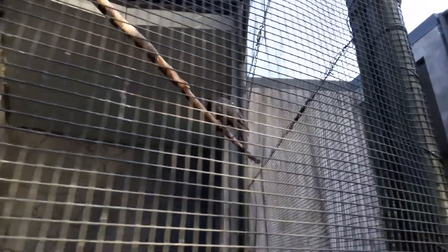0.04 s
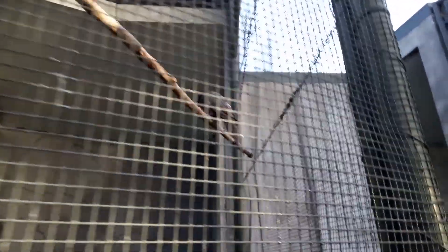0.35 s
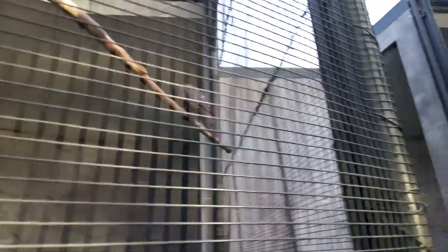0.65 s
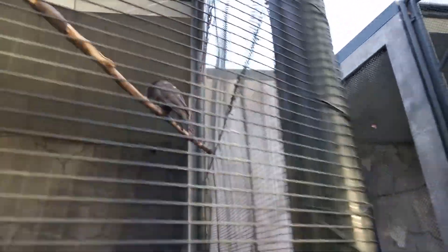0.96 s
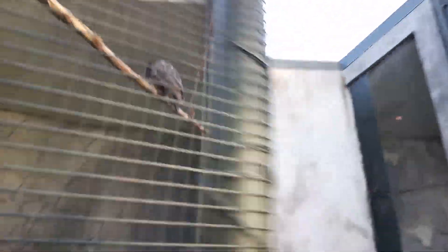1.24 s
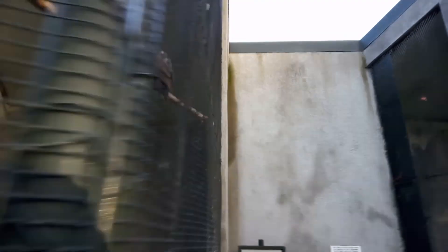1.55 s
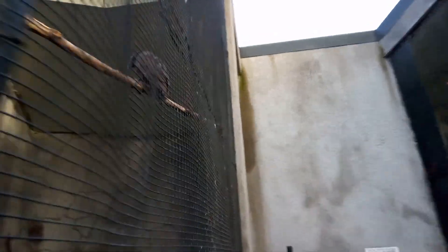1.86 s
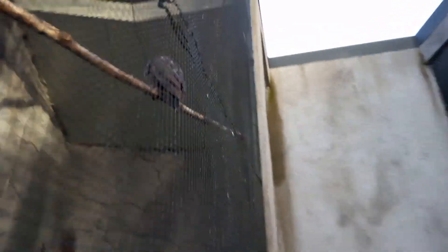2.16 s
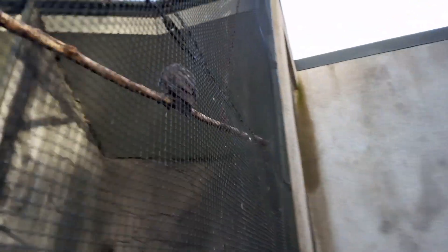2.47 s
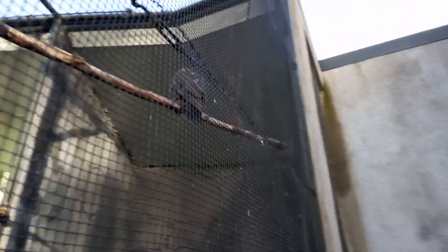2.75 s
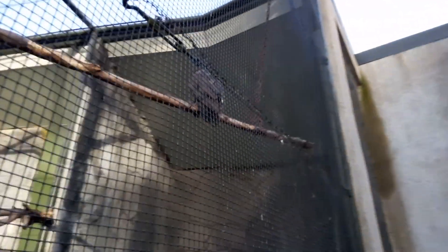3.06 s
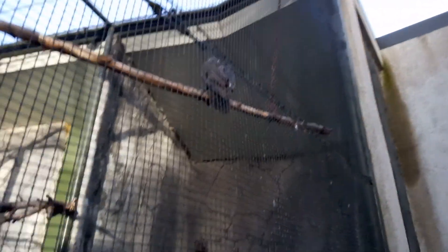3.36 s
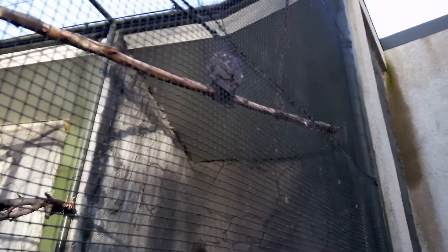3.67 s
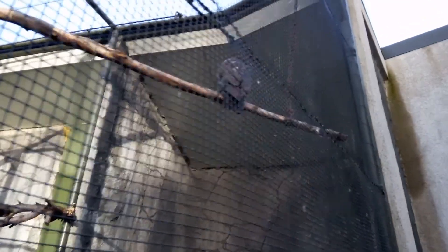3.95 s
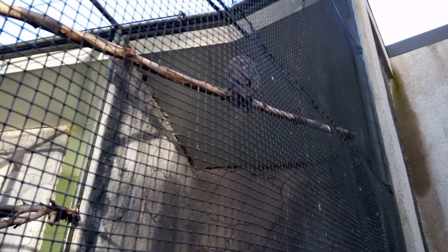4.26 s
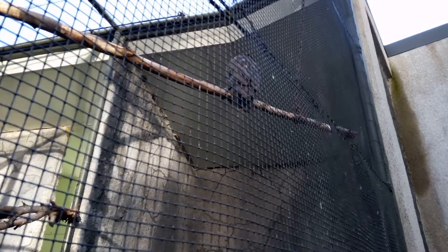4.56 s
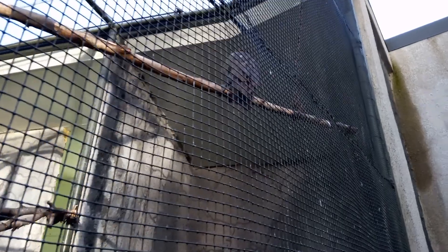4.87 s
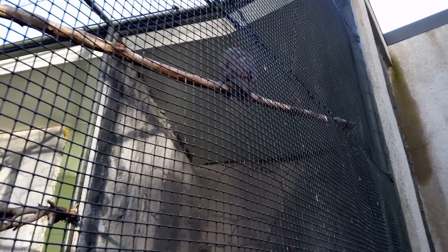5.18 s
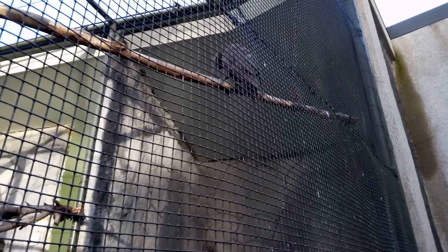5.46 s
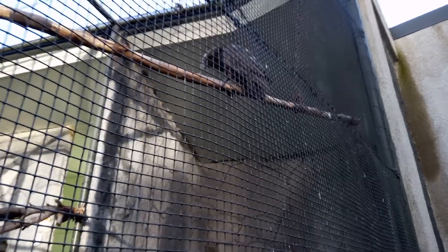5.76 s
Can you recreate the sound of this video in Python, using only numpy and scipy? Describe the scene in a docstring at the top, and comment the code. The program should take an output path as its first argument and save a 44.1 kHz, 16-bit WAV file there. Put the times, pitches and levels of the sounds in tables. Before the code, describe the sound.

Two loud parrot cries sink into a low rasp, with short falling chirps between, over steady outdoor noise in an echoing enclosure.

```python
"""In a concrete aviary fronted with wire mesh, a parrot gives two long falling cries that end harsh and low.
Between them come quick falling chirps, short pips and thin squeaks. Its voice is a vibrating membrane
that turns hoarse when its cycles grow uneven, and the hard walls echo every call.
Close by are a short scrape, a few ticks and taps and a faint rustle.
Behind it all are a steady wash of outdoor noise and a low hum that swells and fades."""
import sys
import numpy as np
from scipy import signal
from scipy.fft import rfft, irfft, next_fast_len
from scipy.io import wavfile
from scipy.ndimage import map_coordinates

SR = 44100
rng = np.random.default_rng(int(sys.argv[2]) if len(sys.argv) > 2 else 0)


def log_audio(samples):
    """Write samples as a 16-bit WAV file to the path given in sys.argv[1]."""
    # one column per channel
    frames = np.atleast_2d(samples).T
    # limit to full scale, then quantise
    limited = np.clip(frames, -1, 1)
    pcm = np.round(limited * 32767).astype(np.int16)
    wavfile.write(sys.argv[1], SR, pcm)


N = 265482
TIME = np.arange(N) / SR
CUTOFF_HZ = 16300


def from_db(db):
    """Turn decibels into a number to multiply by."""
    return 10 ** (np.asarray(db) / 20)


def rms_one(x):
    """Scale a sound so that its average strength (rms) is 1."""
    return x / np.sqrt(np.mean(x ** 2) + 1e-20)


def in_time(rows, t=TIME):
    """Read each column of a table at times t; every row begins with its time."""
    times, *columns = np.transpose(rows)
    return [np.interp(t, times, column) for column in columns]


def at_hz(rows, hz):
    """Read a table of frequencies and values at hz, with the octaves evenly spaced."""
    frequencies, values = np.transpose(rows)
    return np.interp(np.log(hz + 1e-9), np.log(frequencies), values)


def drift(rate, size):
    """A smooth random wobble, about 1 in size, that changes about rate times a second."""
    knots = rng.standard_normal(int(size / SR * rate) + 4)
    return map_coordinates(knots, [1 + np.arange(size) * rate / SR], order=3, mode="nearest")


def coloured(x, colour):
    """Give a sound a colour (a balance of low and high frequencies) and a strength of 1."""
    size = next_fast_len(len(x))
    hz = np.arange(size // 2 + 1) * SR / size
    return rms_one(irfft(rfft(x, size) * from_db(at_hz(colour, hz)), size)[:len(x)])


def resonance(x, hz, width):
    """Let a sound ring around one frequency; a narrower width in Hz rings longer."""
    r = np.exp(-np.pi * width / SR)
    feedback = [1, -2 * r * np.cos(2 * np.pi * hz / SR), r * r]
    return signal.lfilter(np.array([1, 0, -1]) * (1 - r * r) / 2, feedback, x + 1e-18)


def during(start, end, attack, release):
    """The sample numbers of one sound, their times, and a gate that fades it in and out."""
    at = np.arange(int(start * SR), min(int(end * SR), N))
    t = at / SR
    ramp = np.clip(np.minimum((t - start) / attack, (end - t) / release), 0, 1)
    return at, t, np.sin(np.pi / 2 * ramp) ** 2


def air(levels, colour, lumpy_db, rate):
    """Noise whose neighbouring half-octaves swell separately, by about lumpy_db."""
    size = 2 * next_fast_len(N // 2 + 1)
    hz = np.fft.rfftfreq(size, 1 / SR)
    spectrum = rfft(rng.standard_normal(size)) * from_db(at_hz(colour, hz))
    group = np.floor(2 * np.log2(hz + 1)) % 4
    parts = [irfft(spectrum * (group == k))[:N] * from_db(lumpy_db * drift(rate, N)) for k in range(4)]
    return from_db(in_time(levels)[0]) * rms_one(sum(parts))


def background():
    """The background: a wash of outdoor noise, a low rumble that swells in the middle of the scene, a deeper
    rumble, a hiss, and a thinner hiss that fades early."""
    # How loud each layer is. Each row: time in seconds, level in dB.
    wash = [(0, -57.5), (.7, -55), (3.8, -55), (6, -57.5)]
    rumble = [(0, -68.5), (1.1, -69.5), (1.6, -66.5), (2.4, -63.5), (3.4, -55), (4.1, -59.5), (6, -60)]
    deep = [(0, -68), (.6, -65.5), (1.5, -59), (2.8, -71.5), (4.2, -66), (6, -64)]
    hiss = [(0, -66.5), (.7, -63.5), (1.3, -65.5), (3.2, -68.5), (4.2, -66), (5, -70), (6, -67.5)]
    thin_hiss = [(0, -70), (.7, -66.5), (1.4, -73.5), (2.2, -87)]
    # The colour of each layer. Each row: frequency in Hz, gain in dB.
    wash_colour = [(210, -18), (350, -19.5), (676, -3.5), (775, 3), (1060, 5), (1160, 7), (1230, 3.5),
                   (1730, 8.5), (2380, -10.5), (2700, -17), (3510, -29.5), (5940, -120)]
    rumble_colour = [(25, -40.5), (45, -20.5), (65, -10), (110, -4.5), (160, -2.5), (260, -1.5),
                     (400, -5.5), (650, -9), (900, -55)]
    deep_colour = [(20, -32.5), (40, -10.5), (62, 5.5), (100, 4), (150, 4.5), (250, -15.5), (500, -29.5),
                   (900, -49)]
    hiss_colour = [(2000, 7), (2800, 3.5), (4000, 3), (5500, 1), (6700, -5.5), (7800, -19), (9500, -48),
                   (14000, -34), (15500, -14.5), (16500, -32)]
    thin_colour = [(3000, -23), (4500, -3), (5600, 3), (6400, -0.5), (7200, -18), (8500, -35.5)]
    return (air(wash, wash_colour, lumpy_db=1.6, rate=16)
            + air(rumble, rumble_colour, lumpy_db=5, rate=29)
            + air(deep, deep_colour, lumpy_db=3.5, rate=7.8)
            + air(hiss, hiss_colour, lumpy_db=.7, rate=12)
            + air(thin_hiss, thin_colour, lumpy_db=2.2, rate=8.7))


def rubbing(rubs, colour, rise_db_per_s, fall_db_per_s, grain_db=2, grains_per_s=900):
    """Many tiny uneven slips under short strokes, each stroke rising fast and dying away."""
    at, t, gate = during(rubs[0][0] - .02, rubs[-1][0] + .07, .002, .002)
    slips = rng.standard_normal(len(t)) * from_db(grain_db * drift(grains_per_s, len(t)))
    pressure = sum(from_db(db - np.maximum(rise_db_per_s * (peak - t), fall_db_per_s * (t - peak)))
                   for peak, db in rubs)
    out = np.zeros(N)
    out[at] = gate * pressure * coloured(slips, colour)
    return out


def scrape():
    """A few quick rubs close by run together into one short scrape."""
    # The strokes. Each row: time of the peak in seconds, level in dB.
    rubs = [(.405, -56), (.415, -44), (.428, -49), (.4395, -36)]
    # Their colour. Each row: frequency in Hz, gain in dB.
    colour = [(350, -56), (600, -34), (779, -31), (881, -8), (1230, -5), (1410, 1), (2240, -11.5),
              (3250, 4.5), (3580, 0), (6460, -12), (7940, -31), (12000, -28.5), (16000, -31)]
    return rubbing(rubs, colour, rise_db_per_s=1800, fall_db_per_s=641)


def ticks(body_db=10, snap_db=6, decay_s=0.0009):
    """Dry contacts of about a millisecond: a damped knock with a bright snap on top."""
    # Each row: time in seconds, level in dB, brightness of the snap in dB.
    contacts = [(0.4135, -42, -29), (0.436, -26.5, -30), (3.351, -43, -28), (3.539, -35, -47),
                (3.5884, -25.5, -13), (3.6597, -24.5, -15)]
    # How the struck thing rings. Each row: frequency in Hz, width in Hz, gain in dB.
    rings = [(242, 110, -3.5), (1500, 1000, -33), (3330, 710, -8), (5740, 1700, -41)]
    knock, snap = np.zeros(N), np.zeros(N)
    for start, db, bright_db in contacts:
        at, t, gate = during(start, start + .02, .0002, .005)
        burst = from_db(db) * gate * np.exp(-(t - start) / decay_s) * rng.standard_normal(len(t))
        knock[at] += burst
        snap[at] += burst * from_db(bright_db)
    knock = signal.sosfilt(signal.butter(2, 7000, fs=SR, output="sos"), knock + 1e-18)
    body = sum(from_db(db) * resonance(knock, hz, width) for hz, width, db in rings)
    snap = resonance(resonance(snap, 17000, 5300), 19000, 4600)
    return from_db(body_db) * body + from_db(snap_db) * snap


def taps(attack_s=0.0012, decay_s=0.0028):
    """Soft, dull contacts that each ring for a few cycles at one pitch."""
    # Each row: time in seconds, pitch in Hz, level in dB.
    contacts = [(0.436, 1150, -38), (2.9222, 1690, -34), (2.967, 1690, -35)]
    out = np.zeros(N)
    for start, hz, db in contacts:
        at, t, gate = during(start, start + .02, attack_s, .005)
        age = t - start
        out[at] += gate * from_db(db) * np.exp(-age / decay_s) * np.sin(2 * np.pi * hz * age)
    return out


def hum(hz=88.6, peak_s=1.66, peak_db=-50.5, rise_db_per_s=9.5, fall_db_per_s=17):
    """A low, slightly wavering drone, like a far motor, that swells and fades."""
    at, t, gate = during(start=.45, end=3.28, attack=0.027, release=0.18)
    phase = 2 * np.pi * np.cumsum(hz * (1 + .03 * drift(14, len(t)))) / SR
    level = peak_db - np.maximum(rise_db_per_s * (peak_s - t), fall_db_per_s * (t - peak_s))
    out = np.zeros(N)
    out[at] = gate * from_db(level) * np.sqrt(2) * np.sin(phase)
    return out


def syrinx(pitch, rough, throat, count, fraying=0.54, jitter=0.027, shimmer=0.83):
    """The bird's voice membrane: the Hz, gains and waves of its harmonics (multiples of the pitch)."""
    size = len(pitch)
    # Roughness makes the cycles uneven in length (jitter), shape (fraying) and strength (shimmer).
    wobble = drift(900, size) + .5 * drift(160, size)
    phase = 2 * np.pi * np.cumsum(pitch * (1 + jitter * rough * wobble)) / SR
    harmonics = np.arange(1, count + 1)[:, None]
    hz = harmonics * pitch
    # Each harmonic swells on its own as the head and beak move.
    wander_db = 1.5 * np.array([drift(17.05, size) for _ in harmonics])
    gain = from_db(at_hz(throat, hz) + wander_db) * (hz < CUTOFF_HZ)
    fray = fraying * harmonics * rough * np.array([drift(800, size) for _ in harmonics])
    strength = 1 + shimmer * rough * drift(400, size)
    return hz, gain, np.sqrt(2) * np.sin(harmonics * phase + fray) * strength


def rasp(wave, colour):
    """Rushing air, let through once in each cycle of the voice."""
    return coloured(rng.standard_normal(len(wave)) * (1 + wave), colour)


def cry(glide, effort, bands, breaks, throat, rasp_db, flutter_db=4, shiver_db=2.5):
    """A long falling cry: one harmonic after another slides through the main resonance near 2 kHz."""
    # The borders in Hz between five bands of the voice: chest, main, lower ring, upper ring, edge.
    borders = [1330, 2620, 5100, 7450]
    # The colour of the rasp. Each row: frequency in Hz, gain in dB.
    rasp_colour = [(1000, -33), (2000, -4), (3300, -18.5), (4000, 13), (4700, 14), (5200, -12.5),
                   (6400, 3.5), (7900, -45.5), (12000, -57)]
    full_db, open_hz = -40, 1000   # the level and pitch that the bands are set against
    at, t, gate = during(glide[0][0], glide[-1][0], 0.028, 0.01)
    pitch, = in_time(glide, t)
    level, bright = in_time(effort, t)
    rough = 0.0051 + sum(harsh * np.exp(-(np.log2(pitch / hz) / octaves) ** 2)
                         for hz, octaves, harsh in breaks)
    chest, low_ring, high_ring, edge = [
        full_db + db + per_db * (level - full_db) + per_bright * bright
        + per_octave * np.log2(open_hz / pitch)
        for db, per_db, per_bright, per_octave in bands]
    unsteady = 1 + .004 * drift(30, len(t)) + .0013 * drift(140, len(t))   # a waver and a fast shiver
    hz, gain, waves = syrinx(pitch * unsteady, rough, throat, count=22, fraying=.3, jitter=0.026)
    # The higher harmonics flutter in level, each on its own.
    flutter = np.array([flutter_db * drift(35, len(t)) + shiver_db * drift(140, len(t)) for _ in hz])
    waves = waves * from_db(flutter * np.clip(np.log2(hz / borders[0]) / 2, 0, 1))
    below = [0] + [1 / (1 + (hz / top) ** 40) for top in borders] + [1]
    out = np.zeros(N)
    # Each band is evened out, then follows the bird's effort.
    for k, db in enumerate([chest, level, low_ring, high_ring, edge]):
        part = gain * (below[k + 1] - below[k])
        evened = (part * waves).sum(0) / np.sqrt((part ** 2).sum(0) + 1e-9)
        out[at] += gate * from_db(db) * evened
    out[at] += gate * rough * from_db(level + bright + rasp_db) * rasp(waves[0], rasp_colour)
    return out


def two_cries():
    """The first and second cry: each holds a high note, then sinks and turns harsh."""
    # The path of the pitch. Each row: time in seconds, pitch in Hz.
    glide_1 = [(.82, 1240), (.924, 1217), (.955, 1165), (.995, 1206), (1.048, 1151), (1.12, 1134),
               (1.206, 1117), (1.266, 1076), (1.3, 1010), (1.33, 960), (1.355, 936.6), (1.39, 836),
               (1.45, 699.8), (1.49, 628.6), (1.52, 555.4), (1.62, 495.7), (1.87, 416)]
    glide_2 = [(4.48, 1217), (4.6, 1200), (4.65, 1180), (4.735, 1172), (4.757, 1126), (4.8, 1075),
               (4.9, 980), (4.97, 947), (5.012, 940), (5.044, 912), (5.14, 905), (5.182, 874.4),
               (5.21, 828), (5.27, 793.6), (5.31, 699.4), (5.36, 579.8), (5.7, 431.6)]
    # The bird's effort. Each row: time in seconds, level of the main band in dB, brightness in dB.
    effort_1 = [(.82, -59.5, -2), (.96, -48, 0), (1.0, -43.5, 4), (1.041, -32, -2.5), (1.17, -30.5, -2.5),
                (1.27, -35, 1.5), (1.32, -36, 5), (1.39, -34.5, 0.5), (1.47, -43, 3.5), (1.52, -36.5, -4.5),
                (1.619, -46.5, -4), (1.87, -50.5, -11.5)]
    effort_2 = [(4.48, -68.5, -25.5), (4.645, -51, -15), (4.69, -53, 5), (4.725, -48.5, 3), (4.76, -43, 1),
                (4.8, -40, 1.5), (4.97, -41, -1.5), (5.07, -35.5, -8), (5.21, -36.5, -9.5),
                (5.291, -43.5, 1.5), (5.37, -40.5, -10), (5.43, -49.5, -7.5), (5.7, -62, -15)]
    # How chest, lower ring, upper ring and edge follow the effort. Each row: offset in dB,
    # then dB added per dB of level, per dB of brightness and per octave that the pitch sinks.
    bands_1 = [(-10, 0.53, -0.5, -13), (-10.5, 0.8, 2, -1), (-16, 1.03, 1.5, -9), (-40, 1.1, 2, -24)]
    bands_2 = [(-10.5, 0.22, 0.074, -10.5), (-12.5, 0.98, 1.08, -4.5), (-26.5, 2.1, 2.04, 4),
               (-31, 2.4, 3.3, -7.5)]
    # Where the voice breaks. Each row: pitch in Hz, width in octaves, added roughness from 0 to 1.
    breaks_1 = [(998, 0.046, 0.14), (860, 0.089, 0.15), (684, 0.26, 0.4), (443, .2, 0.24)]
    breaks_2 = [(1009.7, 0.045, 0.13), (607, 0.35, 0.68)]
    # The colour of throat and beak. Each row: frequency in Hz, gain in dB.
    throat_1 = [(450, -7), (1100, 3), (1400, -1), (1750, 12), (2300, 1), (2750, 0), (3100, -10.5),
                (3380, -4), (3560, -17), (4050, 1.5), (4480, -9), (4750, -2.5), (5100, -6.5), (5700, 0),
                (6100, 1.5), (6700, -6.5), (7800, -43.5), (10000, -66), (11600, -57), (12600, -88),
                (15000, -97)]
    throat_2 = [(450, -11.5), (1000, 1.5), (1400, -2.5), (1800, 15.5), (2400, 0), (2750, -8), (3200, -3),
                (3620, -3.5), (3900, -15), (4200, -6.5), (4550, -13), (5050, -41), (5400, -15),
                (5900, -28.5), (6600, -3.5), (7500, -37.5), (8500, -33), (10000, -58), (15000, -58)]
    return (cry(glide_1, effort_1, bands_1, breaks_1, throat_1, rasp_db=-4.5),
            cry(glide_2, effort_2, bands_2, breaks_2, throat_2, rasp_db=-20))


def aviary(x, tail_db, build_up_s=0.0067):
    """Add first echoes from the near walls, then a smooth tail whose treble dies soonest."""
    # How long the tail lasts. Each row: frequency in Hz, seconds to fade by 60 dB.
    fade_times = [(200, 0.27), (1000, 0.56), (2000, 0.66), (4000, 0.64), (6000, 0.46), (9000, 0.16),
                  (15000, 0.19)]
    # The first echoes. Each row: delay in seconds, gain in dB.
    walls = [(.0063, -19.5), (0.0117, -13), (0.02, -11.5), (.046, -9.5)]
    t = TIME[:SR]
    edges = np.geomspace(150, 17000, 11)
    response = np.zeros(SR)
    for low, high in zip(edges, edges[1:]):
        band = signal.butter(2, [low, high], "band", fs=SR, output="sos")
        fade = from_db(-60 * t / at_hz(fade_times, np.sqrt(low * high)))
        response += signal.sosfilt(band, rng.standard_normal(SR)) * fade
    response *= from_db(tail_db) * (1 - np.exp(-t / build_up_s)) * np.sqrt(20 / SR)
    response[0] += 1
    for delay, db in walls:
        response[int(delay * SR)] += from_db(db)
    return signal.fftconvolve(x, response)[:N]


def chirps(lead_db=-10, end_db=-7, flutter_db=3.5, rasp_db=3):
    """Thin falling whistles that start softly and peak at a bend in the pitch, near 2 kHz."""
    # Each row: start, bend and end in seconds, the pitch at each in Hz, level in dB, roughness 0 to 1.
    notes = [(0.866, 0.898, 0.97, 1930, 1848, 1540, -55.5, 0),
             (1.901, 2.002, 2.052, 2440, 2100, 1390, -49, 0.27),
             (2.25, 2.316, 2.356, 2450, 2022, 1440, -49.5, 0.14),
             (2.558, 2.609, 2.684, 2580, 2003, 1534, -46.5, 0.19),
             (2.886, 2.942, 2.995, 2760, 2037, 1750, -50, 0.2),
             (3.381, 3.416, 3.505, 2300, 2033, 1597, -49, 0.04)]
    # The colours of the throat and the rasp. Each row: frequency in Hz, gain in dB.
    throat = [(1500, -16.5), (2100, -10), (2650, -3), (3100, 1), (3700, 1.5), (4200, -0.5), (4700, -7.5),
              (5300, -21), (5800, -26.5), (6200, -23.5), (6700, -20), (7200, -25.5), (7700, -35)]
    rasp_colour = [(1500, -13), (2600, 1.5), (3100, 11), (4500, 31), (5400, 8), (6600, 16.5), (7400, -3),
                   (8200, -10), (9200, -15.5), (11000, -27.5)]
    out = np.zeros(N)
    for start, bend, end, start_hz, bend_hz, end_hz, db, rough in notes:
        at, t, gate = during(start, end, 0.026, 0.012)
        pitch, = in_time([(start, start_hz), (bend, bend_hz), (end, end_hz)], t)
        swell, = in_time([(start, lead_db), (bend - .025, lead_db), (bend, 0), (end, end_db)], t)
        swell += flutter_db * drift(160, len(t))
        _, gain, waves = syrinx(pitch, rough, throat, count=3)
        breath = rough * from_db(rasp_db) * rasp(waves[0], rasp_colour)
        out[at] += gate * from_db(db + swell) * ((gain * waves).sum(0) + breath)
    return out


def flaring(x, width_hz=1000):
    """A harmonic blooms for a moment, as when a glide passes a standing wave between the walls."""
    # Each row: time in seconds, half the length in seconds, frequency in Hz, boost in dB.
    flares = [(1.119, 0.028, 2280, 7.5), (1.15, 0.057, 1130, 6.5), (1.13, 0.049, 5630, 1),
              (1.18, 0.031, 3380, 6), (1.203, 0.011, 2240, 8), (1.369, 0.033, 1810, 7),
              (1.44, 0.01, 2270, 4), (1.47, 0.017, 1300, 5), (1.508, 0.014, 1750, 6),
              (1.73, .012, 2360, 3.5), (4.81, 0.047, 6440, 5), (5.013, 0.017, 1880, 8.5),
              (5.114, 0.035, 3660, 7.5), (5.19, 0.022, 3770, 7)]
    out = x.copy()
    for middle, half, hz, db in flares:
        at, t, _ = during(middle - 3 * half, middle + 3 * half, half, half)
        band = signal.butter(2, [hz - width_hz / 2, hz + width_hz / 2], "band", fs=SR, output="sos")
        lift = from_db(db * np.exp(-((t - middle) / half) ** 4))
        out[at] += (lift - 1) * signal.sosfiltfilt(band, x[at])
    return out


def squeaks(beak_db=11, beak_width_hz=550):
    """Thin, hoarse, slightly arched notes; the beak lifts one region of their upper harmonics."""
    # Each row: start and end in seconds, the pitch at each in Hz, arch as a share of the pitch,
    # beak resonance in Hz, level in dB, roughness from 0 to 1.
    notes = [(1.861, 1.912, 2250, 2408, 0.11, 4496, -51, 0.22),
             (1.893, 1.979, 2452, 2200, 0.0074, 5000, -51, 0.12),
             (3.712, 3.893, 931.5, 961, 0.043, 6730, -57.5, 0.36),
             (4.103, 4.236, 1496, 1467, 0.018, 6000, -59.5, 0.33),
             (4.247, 4.345, 1453, 1384, 0.015, 4450, -71, 0.6),
             (4.4, 4.486, 2430, 2510, 0.004, 5200, -78, 0.1)]
    # The colour of the throat. Each row: frequency in Hz, gain in dB.
    throat = [(1000, -5), (2000, -8), (3000, -17), (3900, 1), (4550, -11), (4950, -4), (5900, -14),
              (6900, -21), (7700, -50), (12000, -56)]
    out = np.zeros(N)
    for start, end, start_hz, end_hz, arch, beak_hz, db, rough in notes:
        at, t, gate = during(start, end, 0.0039, .01)
        effort = np.sin(np.linspace(0, np.pi, len(t)))   # lifts pitch and level together
        pitch = np.linspace(start_hz, end_hz, len(t)) * (1 + arch * effort)
        hz, gain, waves = syrinx(pitch, rough, throat, count=9)
        beak = from_db(beak_db / (1 + ((hz - beak_hz) / beak_width_hz) ** 2))
        out[at] += gate * np.sqrt(np.abs(effort)) * from_db(db) * (gain * beak * waves).sum(0)
    return out


def pips(rough=.35, arch=.05, fall=.1):
    """Brief hoarse notes that lead into chirps; the pitch arches and falls by a small share."""
    # Each row: start and end in seconds, pitch in Hz, level in dB, gain of the octave above in dB.
    notes = [(2.188, 2.292, 2350, -69, -9), (2.535, 2.574, 2624, -56, -6), (2.872, 2.914, 2675, -57.5, -24),
             (3.353, 3.391, 2630, -60.5, -18)]
    out = np.zeros(N)
    for start, end, hz, db, octave_db in notes:
        at, t, gate = during(start, end, 0.0073, 0.016)
        along = np.linspace(0, 1, len(t))
        bend = arch * np.sin(np.pi * along) - fall * along ** 2
        _, gain, waves = syrinx(hz * (1 + bend), rough, [(hz, 0), (2 * hz, octave_db)], count=2)
        out[at] += gate * from_db(db) * (gain * waves).sum(0)
    return out


def rustle():
    """Two light rubs make a faint, high rustle."""
    # The strokes. Each row: time of the peak in seconds, level in dB.
    rubs = [(3.218, -56.5), (3.236, -66)]
    # Their colour. Each row: frequency in Hz, gain in dB.
    colour = [(2500, -6), (4500, -14), (5900, 6), (6700, -5), (7900, -10), (9000, -38), (12000, -29),
              (16000, -24)]
    return rubbing(rubs, colour, rise_db_per_s=1400, fall_db_per_s=700)


def scene():
    """The bird with its echoes, the small noises near by and the background, in one channel."""
    first, second = two_cries()
    cries = flaring(aviary(first, tail_db=-4) + aviary(second, tail_db=-0.5))
    short_calls = aviary(chirps() + pips(), tail_db=1) + aviary(squeaks(), tail_db=-2.5)
    return (cries + short_calls + scrape() + rustle() + background() + ticks() + taps() + hum())[None]


def record(dry):
    """Cut off the very highest treble steeply."""
    return signal.sosfilt(signal.ellip(10, .2, 80, CUTOFF_HZ, fs=SR, output="sos"), dry)


dry = scene()
out = record(dry)
log_audio(out)
```